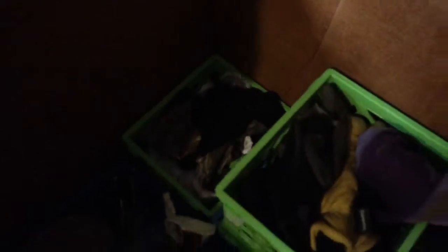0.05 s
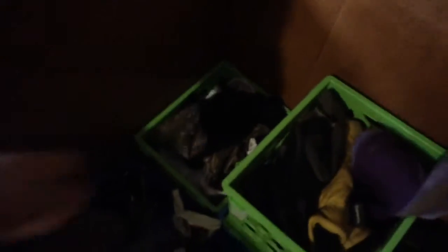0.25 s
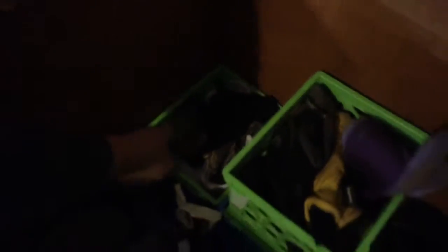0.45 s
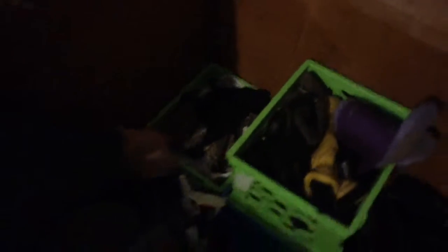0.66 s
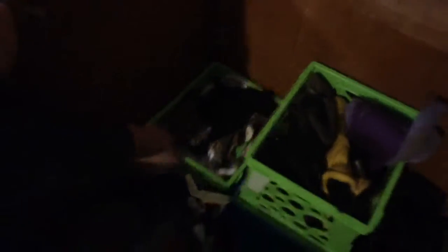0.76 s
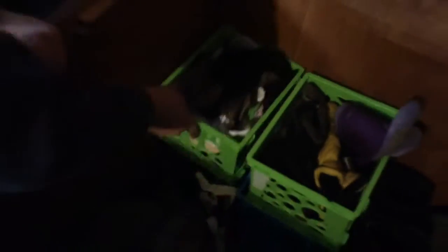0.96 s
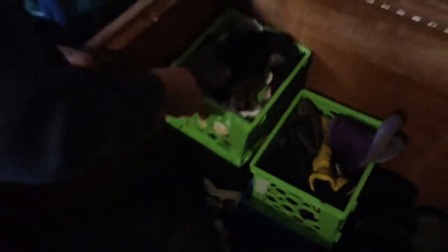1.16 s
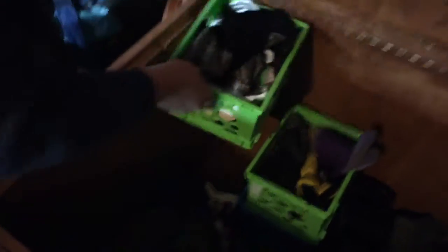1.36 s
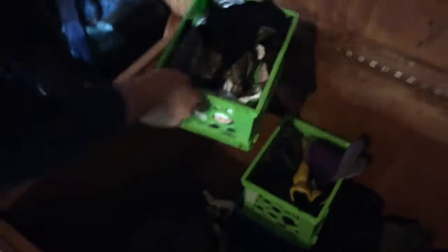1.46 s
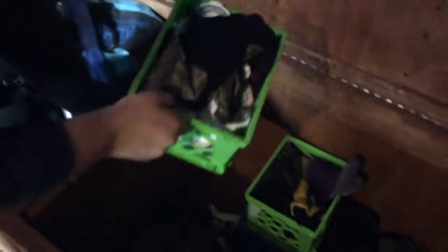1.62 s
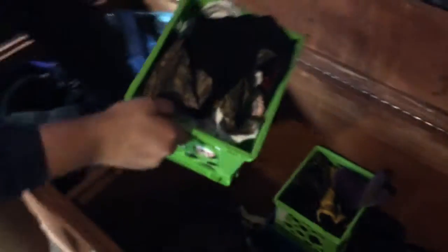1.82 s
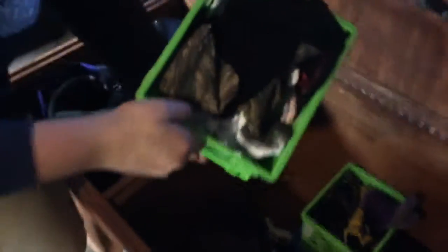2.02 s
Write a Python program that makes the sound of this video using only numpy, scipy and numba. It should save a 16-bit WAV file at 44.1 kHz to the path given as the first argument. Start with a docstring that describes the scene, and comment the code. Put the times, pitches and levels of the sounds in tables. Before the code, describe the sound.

A loaded plastic crate is dragged over a wooden trunk floor. A soft hollow scuff with a tiny squeak at 0.13-0.2 s, faint breathy cloth rustle around 0.4-0.5, a short sharp scrape at 0.56-0.66. From 0.8 to 1.35 rough scraping and clattering knocks, hardest and overloaded near 0.94; metal clink at 1.01. Then faint rustle, light taps at 1.7-1.85, quiet air. Close, boxy, mono.

```python
"""A trunk with a wooden floor: a loaded plastic crate is gripped, jolted loose, dragged over it and lifted clear.
Random grit catches excite the plastic and the boards; knocks push floor modes and rattle the crate.
A small metal thing inside clinks, as a narrow ring excited by grit; a wavering sine squeaks.
Filtered grit makes the first soft scuff, cloth rustle, a faint breath-like swell and the shifting load.
Close walls reflect the crate; the close mono microphone overloads on the hardest knock."""
import sys
import numpy as np
from scipy import signal
from scipy.fft import rfft, irfft, next_fast_len
from scipy.io import wavfile
from numba import njit

SR = 44100
rng = np.random.default_rng(int(sys.argv[2]) if len(sys.argv) > 2 else 0)


def inscribe(sig):
    """Save sig as 16-bit PCM at rate SR to the path in sys.argv[1].

    A 1-D sig is mono; a 2-D sig holds one channel per row.
    Samples are clipped to [-1, 1] before scaling.
    """
    pcm = np.round(np.clip(np.atleast_2d(sig).T, -1, 1) * 32767)
    wavfile.write(sys.argv[1], SR, pcm.astype(np.int16))


N = 91948


def undb(db):
    """Decibels to gain."""
    return 10 ** (np.asarray(db) / 20)


def unit_rms(x):
    """Scale to rms 1."""
    return x / np.sqrt(np.mean(x ** 2))


def unit_energy(response):
    """Scale an impulse response to energy 1."""
    return response / np.linalg.norm(response)


def clock():
    """Time of every sample in seconds."""
    return np.arange(N) / SR


def curve(rows, axis=1):
    """Gain interpolated in dB along a column; -120 dB outside the points."""
    rows = np.array(rows)
    return undb(np.interp(clock(), rows[:, 0], rows[:, axis], left=-120, right=-120))


def swells(rows, axis):
    """Sum of Gaussian level swells; rows start with centre and 1/e half-width in seconds."""
    return sum(undb(row[axis]) * np.exp(-((clock() - row[0]) / row[1]) ** 2) for row in rows)


def walk(points_per_s):
    """Random wander with a spread near 1, linear between Gaussian points."""
    draws = rng.standard_normal(2048)
    return np.interp(clock() * points_per_s, np.arange(len(draws)), draws)


def through(x, response):
    """Convolve x with an impulse response."""
    return signal.fftconvolve(x, response)[:N]


def low_cut(x, hz):
    """Second-order high-pass."""
    return signal.sosfilt(signal.butter(2, hz, "high", fs=SR, output="sos"), x)


def colour(x, points):
    """Minimum-phase filter of unit energy that follows (Hz, dB) points."""
    size = 8192
    hz, db = np.array(points, float).T
    bins_hz = np.arange(size // 2 + 1) * SR / size
    gain = undb(np.interp(np.log(bins_hz + 1), np.log(hz), db))
    # fold the cepstrum to make the response causal
    cepstrum = irfft(np.log(gain))
    cepstrum[1:size // 2] *= 2
    cepstrum[size // 2 + 1:] = 0
    return through(x, unit_energy(irfft(np.exp(rfft(cepstrum)))))


def ring(modes):
    """Impulse response of exponentially decaying sine modes (Hz, dB, t60 s)."""
    t = clock()[:SR // 2]
    return sum(undb(db - 60 * t / t60_s) * np.sin(2 * np.pi * hz * t) for hz, db, t60_s in modes)


def wash(t60_s):
    """Dense reflections: decaying noise of unit energy after 1 ms."""
    t = clock()[:SR // 2]
    decay = np.exp(-np.log(1000) * t / t60_s)
    return unit_energy(rng.standard_normal(len(t)) * decay * (t > .001))


# Air spectrum. Each row: frequency in Hz, relative level in dB.
AIR_SPECTRUM = [(20, -15), (50, -3), (590, -11.5), (2000, -16.5), (4000, -23.5), (15000, -29.5)]
AIR_DB = -57.5


def air():
    """Quiet air: steady coloured noise."""
    return undb(AIR_DB) * unit_rms(colour(rng.standard_normal(N), AIR_SPECTRUM))


# Low boom of the trunk. Each row: time in seconds, level in dB.
BOOM_LEVELS = [(0, -81), (.2, -34.5), (.32, -52.5), (.77, -52.5), (.82, -28.5), (.96, -28.5), (1.05, -34.5),
               (1.4, -58.5), (2.08, -75.5)]
# Boom spectrum. Each row: frequency in Hz, relative level in dB.
BOOM_COLOUR = [(20, -25), (78, -1), (106, 3.5), (135, -4.5), (800, -55.5)]


def boom():
    """The trunk booms as weight shifts on it: low noise under a level curve."""
    return unit_rms(colour(rng.standard_normal(N), BOOM_COLOUR)) * curve(BOOM_LEVELS)


GRIT_PER_S, GRIT_SPREAD_DB = 4000, 2
CHATTER_DB, CHATTER_PER_S = 1, 220


def grit():
    """Dense tiny catches of uneven size, bunched by stick and slip."""
    hits = (rng.random(N) < GRIT_PER_S / SR) * rng.choice([-1, 1], N)
    sizes = undb(GRIT_SPREAD_DB * np.clip(rng.standard_normal(N), -2, 2))
    return unit_rms(hits * sizes * undb(CHATTER_DB * walk(CHATTER_PER_S)))


# Soft swells. Each row: centre in s, half-width in s, cloth rustle in dB, breath-like swell in dB.
SOFT_SWELLS = [(.385, 0.082, -60, -51), (.485, 0.058, -53, -61), (1.61, .11, -50.5, -80)]
# Rustle spectrum. Each row: frequency in Hz, relative level in dB.
CLOTH_SPECTRUM = [(200, -3), (900, 2.5), (7500, -5), (15500, -15.5)]
# Spectrum of the breath-like swell. Each row: frequency in Hz, relative level in dB.
BREATHY_SPECTRUM = [(600, -33), (1500, -12), (1950, 0.5), (2550, -3), (3200, -17.5), (8000, -29)]


def cloth_and_breathy_swell():
    """Broad cloth rustle, and a faint, smooth, breath-like swell around 2 kHz; both filtered grit."""
    rustle = colour(grit() * swells(SOFT_SWELLS, axis=2), CLOTH_SPECTRUM)
    breathy = colour(grit() * swells(SOFT_SWELLS, axis=3), BREATHY_SPECTRUM)
    return rustle + breathy


# Soft shifts of the load. Each row: centre in s, half-width in s, level in dB.
LOAD_SHIFTS = [(.465, 0.032, -41.5), (.68, 0.036, -44), (.75, 0.013, -38.5), (1.41, 0.05, -49.5)]
# Shift spectrum. Each row: frequency in Hz, relative level in dB.
LOAD_SPECTRUM = [(90, -25), (190, 3.5), (420, -11.5), (3000, -37.5)]


def load():
    """The load shifts softly against the crate: low-coloured grit."""
    return colour(grit() * swells(LOAD_SHIFTS, axis=2), LOAD_SPECTRUM)


# Soft scuffs before the pull. Each row: centre in s, half-width in s, ring in dB, rub in dB.
SOFT_SCUFFS = [(.134, 0.024, -38, -44), (.194, 0.02, -49.5, -36.5)]
# Hollow modes of the scuffs. Each row: frequency in Hz, relative level in dB, t60 in s.
HOLLOW_MODES = [(788, 3.3, 0.12), (1063, 4, 0.077), (2300, 3.4, .012)]
# Rub spectrum. Each row: frequency in Hz, relative level in dB.
RUB_SPECTRUM = [(200, -8), (700, 5.5), (1500, -2.5), (15000, -25)]


def scuffs():
    """Grit excites hollow modes and rubs broadly."""
    hollow = through(grit() * swells(SOFT_SCUFFS, axis=2), unit_energy(ring(HOLLOW_MODES)))
    return hollow + colour(grit() * swells(SOFT_SCUFFS, axis=3), RUB_SPECTRUM)


# Squeak of the first scuff. Each row: centre in s, half-width in s, level in dB.
SCUFF_SQUEAKS = [(.140, 0.02, -36)]
SQUEAK_HZ, SQUEAK_JITTER_SHARE = 798, 0.011
SQUEAK_ROUGH_DB, SQUEAK_WANDER_PER_S = 2.5, 230


def squeak():
    """Stick and slip lock for a moment into an unsteady tone."""
    hz = SQUEAK_HZ * (1 + SQUEAK_JITTER_SHARE * walk(SQUEAK_WANDER_PER_S))
    tone = np.sin(2 * np.pi * np.cumsum(hz) / SR)
    rough = undb(SQUEAK_ROUGH_DB * walk(SQUEAK_WANDER_PER_S))
    return unit_rms(tone * rough) * swells(SCUFF_SQUEAKS, axis=2)


# Metal mode. Each row: frequency in Hz, relative level in dB, t60 in s.
METAL_MODES = [(9490, 0, 0.023)]
CLINK_CENTRE_S, CLINK_HALF_WIDTH_S, CLINK_DB = 1.014, .014, -31


def clink():
    """A small metal thing in the load jiggles and rings briefly."""
    jiggle = grit() * swells([(CLINK_CENTRE_S, CLINK_HALF_WIDTH_S, CLINK_DB)], axis=2)
    return through(jiggle, unit_energy(ring(METAL_MODES)))


# Modes of the wooden floor. Each row: frequency in Hz, level in dB before the low cut, t60 in s.
BOARD_MODES = [(100, -6.5, 0.059), (161.2, 2.5, 0.073), (191.4, 1.5, 0.077), (328.8, -11.5, .1),
               (389, -8.5, 0.052), (498.6, -10, 0.074)]
BOARD_CUT_HZ = 202


def boards():
    """Floor impulse response; the boards radiate little below the cut."""
    return low_cut(ring(BOARD_MODES), BOARD_CUT_HZ)


# Knocks of the crate. Each row: start in s, thud of the boards in relative dB, length of the push in s,
# clack of the plastic in relative dB, tick of the edge in relative dB, centre of the clack in Hz.
CRATE_KNOCKS = [(.570, -48, .0017, -16.5, -16.5, 1100), (.634, -30, 0.0014, -33, -45, 500),
                (0.64, -45, 0.0021, -20, -34.5, 1150), (.705, -39, 0.0016, -31.5, -48, 3600),
                (.717, -37, .0015, -27, -41.5, 1000), (0.768, -30, 0.0014, -37.5, -33, 2000),
                (.806, -2.5, 0.0023, -16, -40.5, 520), (.835, -6.5, 0.0019, -15, -38, 600),
                (0.841, -33, 0.0021, -21, -10.5, 2800), (.848, -13.5, 0.0026, -19, -32, 1200),
                (0.871, -29.5, 0.0012, -22.5, -25, 700), (.921, -17, 0.001, -8.5, -11.5, 1900),
                (.932, -19.5, 0.0015, -3.5, -13.5, 2300), (.94, 0.5, 0.0024, -6, -17.5, 500),
                (0.946, 4, 0.0013, 0.5, -32, 1100), (.973, -10, 0.0016, -10.5, -34.5, 500),
                (.98, -3.5, 0.0016, -8, -28, 1400), (.995, -7.5, 0.0024, -14, -15, 1300),
                (1.013, -14.5, .0017, -13.5, -16.5, 1700), (1.236, -12.5, 0.0029, -26, -31, 1700),
                (1.304, -17.5, 0.0023, -26, -40, 1500), (1.325, -30.5, 0.0031, -21, -45, 550),
                (1.715, -35.5, .0025, -45, -58.5, 750), (1.848, -62.5, .0017, -37, -44, 1290),
                (1.857, -70, 0.0016, -43, -42.5, 700)]


def thuds():
    """Half-sine pushes of equal area at equal dB ring the boards; a longer push sounds rounder."""
    t, floor, pushes = clock(), boards(), 0
    for start_s, thud_db, push_s, *_ in CRATE_KNOCKS:
        half_sine = np.sin(np.pi * np.clip((t - start_s) / push_s, 0, 1))
        pushes = pushes + undb(thud_db) / push_s * half_sine
    return through(pushes * np.pi / (2 * SR), floor / np.abs(floor).max())


# Modes of the crate. Each row: frequency in Hz, relative level in dB, t60 in s.
CRATE_MODES = [(431, -2, 0.089), (520, 6, .06), (1020.4, 7.5, 0.098), (1346, 9.5, 0.017)]
RING_DB = -12.5  # relative, before the division by pi
MODE_WANDER_DB, MODE_WANDER_PER_S = 4.5, 32


def plastic(x):
    """The crate's walls ring along; as the contact moves, each mode is caught more or less strongly."""
    walls = 0
    for mode in CRATE_MODES:
        caught = x * undb(MODE_WANDER_DB * walk(MODE_WANDER_PER_S))
        walls = walls + through(caught, ring([mode]))
    walls = walls / np.linalg.norm(ring(CRATE_MODES))
    return (x + undb(RING_DB) * walls / np.pi) / np.hypot(1, undb(RING_DB))


def burst(start_s, db, decay_s):
    """A brief crackle of contact: noise with exponential decay."""
    since_s = clock() - start_s
    decay = (since_s >= 0) * np.exp(-np.abs(since_s) / decay_s)
    return undb(db) * decay * rng.standard_normal(N)


# Clack spectrum. Each row: frequency in Hz, relative level in dB.
CLACK_SPECTRUM = [(100, -18.5), (350, 5.5), (900, -3), (1400, -4), (2100, -5.5), (3200, -12.5), (6000, -28),
                  (14000, -56)]
# Tick spectrum. Each row: frequency in Hz, relative level in dB.
TICK_SPECTRUM = [(500, -21.5), (2000, 4.5), (3200, 0), (5200, 1), (7500, 1.5), (10000, -4.5),
                 (15500, -10.5)]
CLACK_DECAY_S, TICK_DECAY_S = .005, 0.0039  # to 1/e
CLACK_Q, CLACK_FOCUS_DB = 2.05, 6  # the struck wall rings over the general rattle


def clacks():
    """Knocks rattle the plastic, most around the pitch of the struck wall, and tick at the edge."""
    rattle, ticks = 0, 0
    for start_s, _, _, clack_db, tick_db, hz in CRATE_KNOCKS:
        blow = burst(start_s, clack_db, CLACK_DECAY_S)
        struck_wall = signal.lfilter(*signal.iirpeak(hz, CLACK_Q, fs=SR), blow)
        rattle = rattle + undb(-CLACK_FOCUS_DB) * blow + struck_wall
        ticks = ticks + burst(start_s, tick_db, TICK_DECAY_S)
    return colour(plastic(rattle), CLACK_SPECTRUM) + colour(ticks, TICK_SPECTRUM)


FLICKER_DB, FLICKER_PER_S = 2, 45
BAND_EDGES_HZ = 250 * 2 ** (np.arange(12) / 2)


def flicker(x):
    """The rubbing point wanders: half-octave bands, and both ends beyond, vary in level separately."""
    size = next_fast_len(N, True)
    spectrum = rfft(x, size)
    band = np.searchsorted(BAND_EDGES_HZ, np.arange(size // 2 + 1) * SR / size)
    total = 0
    for k in np.unique(band):
        part = irfft(spectrum * (band == k), size)[:N]
        total = total + part * undb(FLICKER_DB * walk(FLICKER_PER_S))
    return total


@njit
def resonate(x, hz, width_hz):
    """State-variable band-pass with a moving centre, gain 1 there."""
    y, band, low = np.empty(len(x)), 0., 0.
    for i in range(len(x)):
        g, k = np.tan(np.pi * hz[i] / SR), width_hz / hz[i]
        v = (band + g * (x[i] - low)) / (1 + g * (g + k))
        band, low, y[i] = 2 * v - band, low + 2 * g * v, k * v
    return y


DRIFT_SHARE, DRIFT_PER_S = .025, 22
BROAD_DB = -2.5  # rattle between the resonances


def base(x, resonances):
    """The crate's base resonates; its pitches drift as the contact slides."""
    peaks = 0
    for hz, width_hz, db in resonances:
        centre_hz = hz * (1 + DRIFT_SHARE * walk(DRIFT_PER_S))
        peaks = peaks + undb(db) * resonate(x, centre_hz, float(width_hz))
    return undb(BROAD_DB) * x + peaks / 2


# Scrape body spectrum. Each row: frequency in Hz, relative level in dB.
BODY_SPECTRUM = [(100, -17), (260, -2.5), (400, 2.5), (700, -2.5), (1200, -2), (1950, -2.5), (2450, -11.5),
                 (4000, -15), (9000, -53)]
# Contact hiss spectrum. Each row: frequency in Hz, relative level in dB.
HISS_SPECTRUM = [(600, -34), (1800, 2), (2800, 4), (4200, 1), (6000, -1), (8700, -6), (11200, -11.5),
                 (15500, -21.5)]


def scrape(levels, resonances, rumble_db):
    """One slide: grit shakes the crate, hisses at the contact and rumbles in the boards."""
    force = curve(levels, axis=1)
    body = colour(base(plastic(flicker(grit()) * force), resonances), BODY_SPECTRUM)
    hiss = colour(flicker(grit()) * curve(levels, axis=2), HISS_SPECTRUM)
    rumble = through(grit() * force, unit_energy(boards()))
    return body + hiss + undb(rumble_db) * rumble


# Short shove. Each row: time in s, body level in relative dB, treble level in relative dB.
SHOVE_LEVELS = [(.546, -68, -45), (.552, -37, -30.5), (.565, -22, -21.5), (.578, -31, -25.5),
                (.604, -30.5, -26), (.613, -31, -33), (.634, -33, -32.5), (.643, -28.5, -33),
                (.657, -31, -37.5), (.675, -45, -52), (.75, -59, -57)]
# Base resonances, set by where it bears on the floor. Each row: centre in Hz, width in Hz, relative dB.
SHOVE_BASE = [(443, 44, 4.5), (636, 64, 13.5), (1030, 70, 4.5), (2077, 120, 9.5)]
# Shove spectrum. Each row: frequency in Hz, relative level in dB.
SHOVE_SPECTRUM = [(200, -15), (420, -2), (820, -1), (4000, -7), (13000, 8)]
SHOVE_DB, SHOVE_RUMBLE_DB = 5.5, -21.5


def shove():
    """The first short slide jolts the crate loose."""
    slide = scrape(SHOVE_LEVELS, SHOVE_BASE, SHOVE_RUMBLE_DB)
    return undb(SHOVE_DB) * colour(slide, SHOVE_SPECTRUM)


# Long drag. Each row: time in s, body level in relative dB, treble level in relative dB.
DRAG_LEVELS = [(.745, -52, -62), (.77, -40.5, -39), (.80, -37.5, -37.5), (.832, -30.5, -26),
               (.844, -21.5, -17.5), (.855, -24, -27.5), (.875, -25, -28), (.91, -33, -30.5),
               (.95, -23.5, -34.5), (.968, -34.5, -33), (1.0, -22, -30), (1.018, -24, -27.5),
               (1.04, -26.5, -31.5), (1.14, -28.5, -38), (1.165, -27, -30), (1.205, -33.5, -32.5),
               (1.24, -27.5, -33.5), (1.26, -37, -39), (1.293, -33, -37), (1.308, -27, -36),
               (1.333, -30.5, -38), (1.345, -41.5, -55), (1.39, -67, -78)]
# Base resonances, set by where it bears on the floor. Each row: centre in Hz, width in Hz, relative dB.
DRAG_BASE = [(546, 100, 7.4), (1227, 85, 7.5), (1573, 44, 5.1), (1854, 100, 8.9), (2877, 100, 3.2)]
DRAG_RUMBLE_DB = -0.5


def drag():
    """The long slide over the boards."""
    return scrape(DRAG_LEVELS, DRAG_BASE, DRAG_RUMBLE_DB)


TRUNK_T60_S, TRUNK_DB, TRUNK_CUT_HZ = 0.0385, -10, 810
TAIL_T60_S, TAIL_DB = 0.28, -18.5


def scene():
    """The crate between the close walls of the trunk, over quiet air; both channels alike."""
    crate = shove() + drag() + clacks() + clink()
    walls = low_cut(through(crate, wash(TRUNK_T60_S)), TRUNK_CUT_HZ)
    enclosed = (crate + undb(TRUNK_DB) * walls) / np.hypot(1, undb(TRUNK_DB))
    soft_layers = scuffs() + squeak() + boom() + load() + cloth_and_breathy_swell()
    near = enclosed + thuds() + soft_layers
    tail = undb(TAIL_DB) * through(near, wash(TAIL_T60_S))
    mono = near + tail + air()
    return np.array([mono, mono])


CEILING, TOP_HZ = 1.0, 15300


def record(dry):
    """The recorder clips peaks above the ceiling, then cuts the top with an elliptic low-pass."""
    clipped = np.clip(dry, -CEILING, CEILING)
    return signal.sosfilt(signal.ellip(8, .2, 70, TOP_HZ, fs=SR, output="sos"), clipped)


dry = scene()
out = record(dry)
inscribe(out)
```